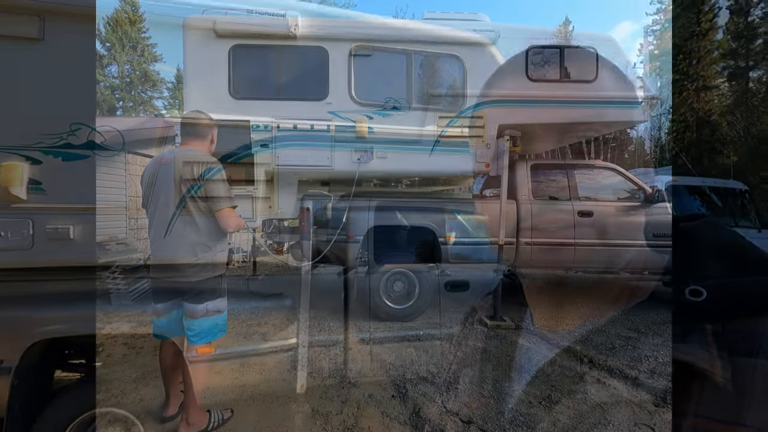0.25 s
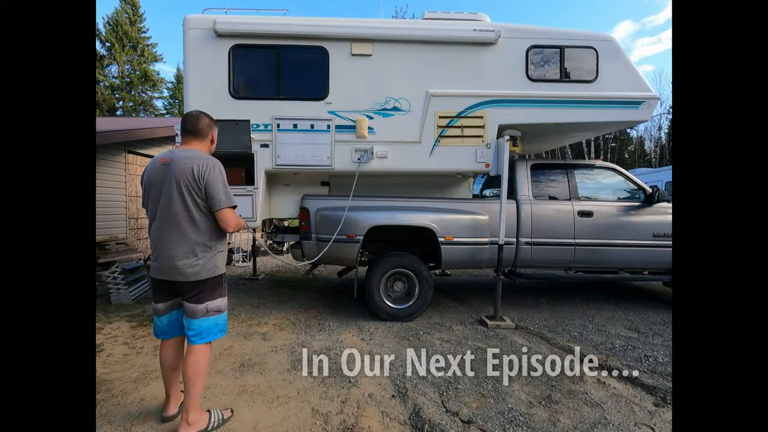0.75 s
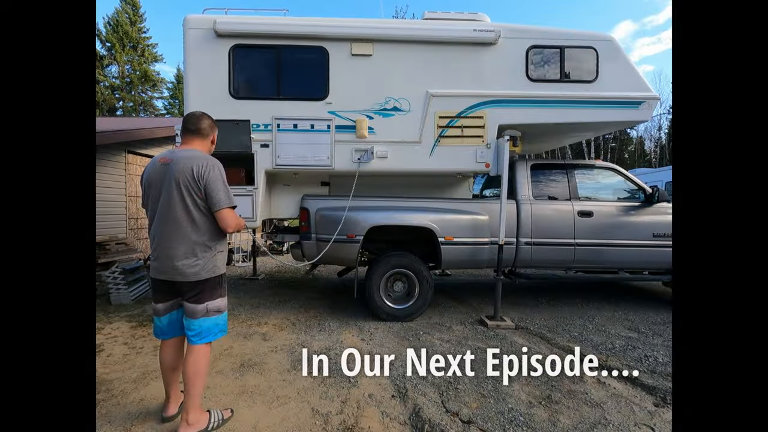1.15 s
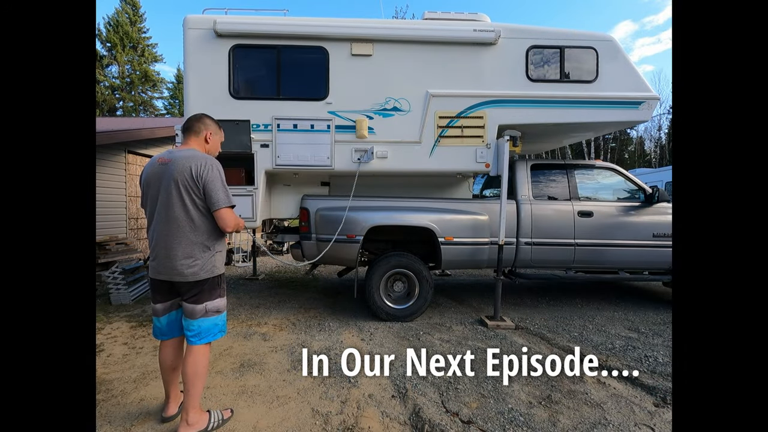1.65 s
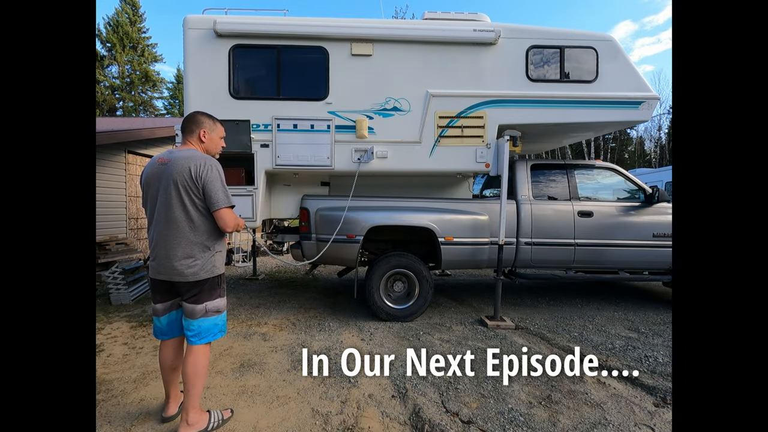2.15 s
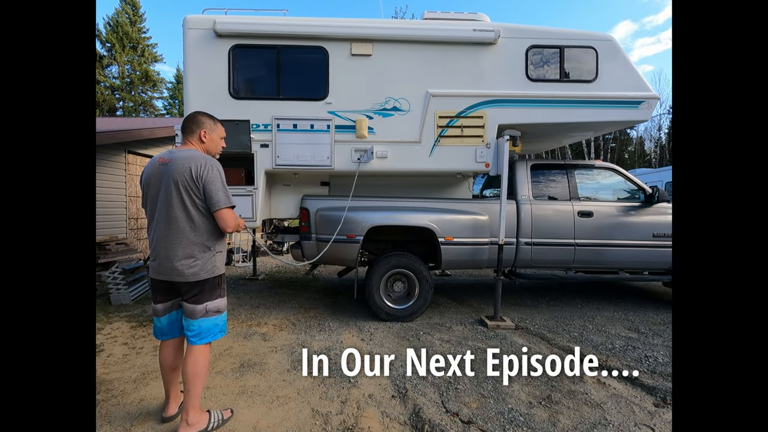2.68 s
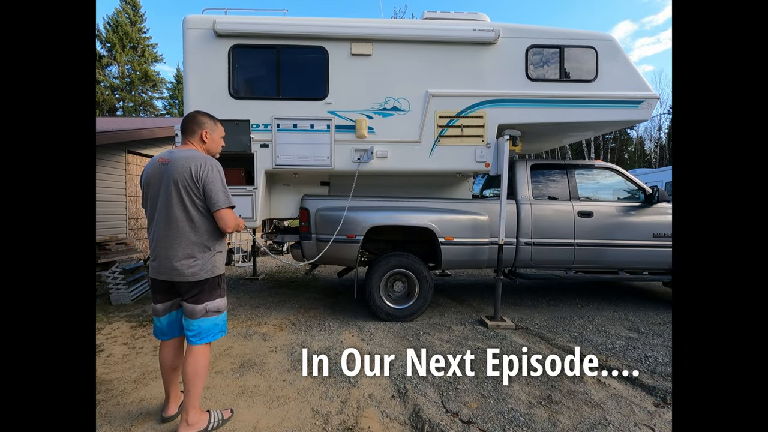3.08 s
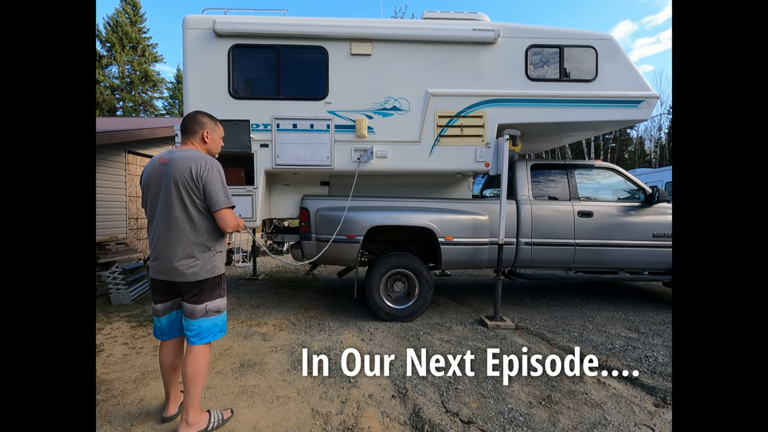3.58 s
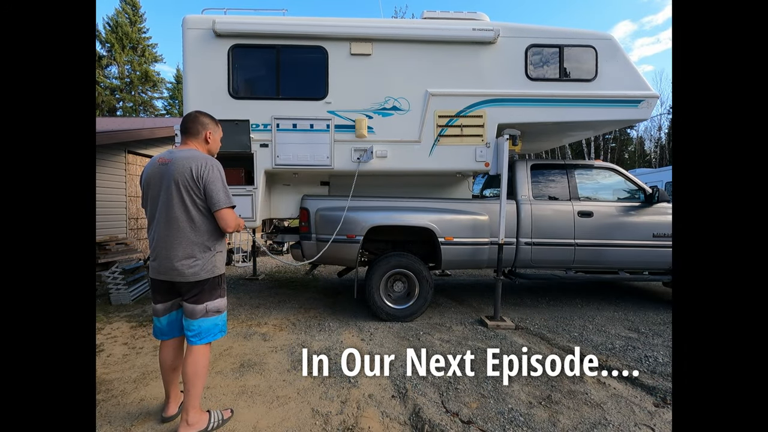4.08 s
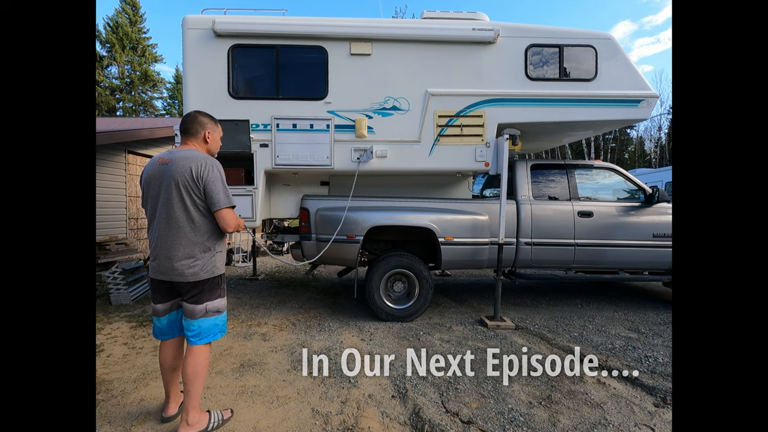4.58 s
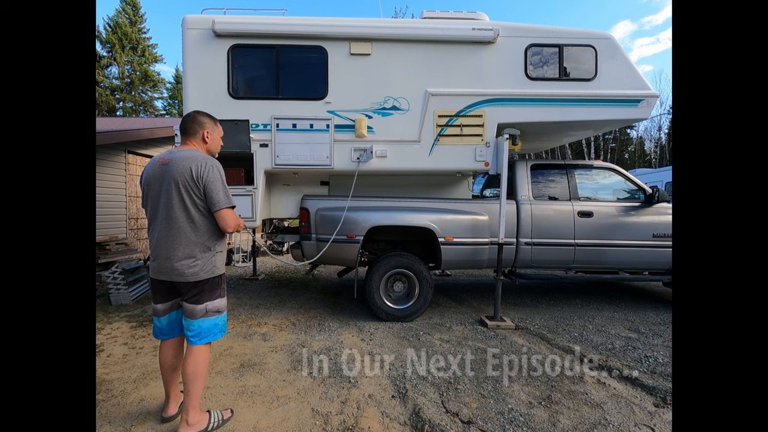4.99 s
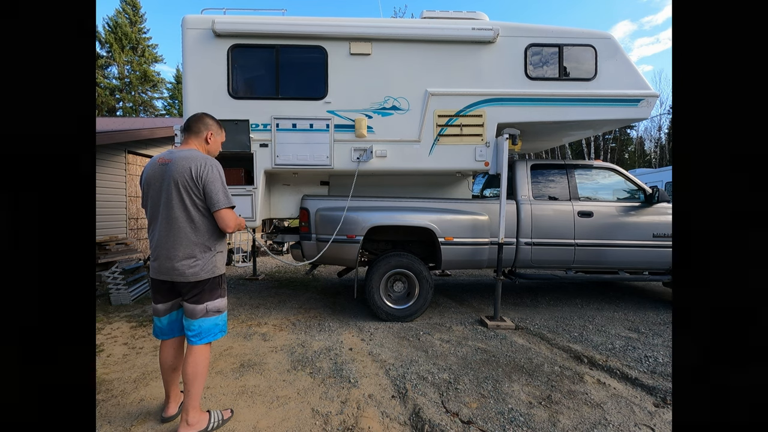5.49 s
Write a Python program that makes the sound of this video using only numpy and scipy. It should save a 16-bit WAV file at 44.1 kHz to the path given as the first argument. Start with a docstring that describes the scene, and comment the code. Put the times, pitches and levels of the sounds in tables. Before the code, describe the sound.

Outdoors, a relay click and short gritty motor buzz, a second of quiet air, then a longer geared electric whine that cuts off abruptly.

```python
"""Electric camper jacks in a quiet yard

A relay clicks and, out of a faint swelling noise, one motor buzzes for under a second: shaft harmonics
over gear chatter. After a pause a faster one clicks in, spins up, whines for over three seconds and is
switched off. Its pinion sings at the tooth rate over weaker shaft tones, chatter rung by the leg and a hum.
A slow wheel rasps once a turn, and the lifting screw drags the pitch down each time it binds.
Noise bursts make the clicks and the jolts of the leg; soft, coloured noise is the outdoor air."""
import sys
import numpy as np
from scipy import signal
from scipy.fft import rfft, irfft
from scipy.io import wavfile

SR = 44100
rng = np.random.default_rng(int(sys.argv[2]) if len(sys.argv) > 2 else 0)


def inscribe(sig):
    """Save sig as 16-bit PCM at rate SR to the path in sys.argv[1].

    A 1-D sig is mono; a 2-D sig holds one channel per row.
    Samples are clipped to [-1, 1] before scaling.
    """
    pcm = np.round(np.clip(np.atleast_2d(sig).T, -1, 1) * 32767)
    wavfile.write(sys.argv[1], SR, pcm.astype(np.int16))


N = 252867
TIME = np.arange(N) / SR  # seconds

# spectrum of the outdoor air: f/Hz, level/dB
YARD_COLOUR = [(15, -25), (25, -22), (91, -9.5), (142, -15.5), (175, -4), (267, -5.5), (348, -2.5),
               (441, -3.5), (558, -1.5), (921, -10.5), (1480, -11), (6500, -35.5), (13500, -54)]
# relay contacts and gears taking up their slack: t/s, level/dB, decay/s, treble share (0-1)
CLICKS = [(0.1508, -35.5, 0.0023, 0.1), (0.1543, -38.5, 0.0036, 0.06), (2.064, -41, 0.0045, 0.33),
          (2.177, -25, 0.015, 0.7)]
# dull spectrum of the relay box: f/Hz, level/dB
RELAY_COLOUR = [(200, -26), (600, -8), (1500, 7), (2500, -3), (4400, -9), (5500, -28), (12000, -55)]
# the leg rings as a motor brakes or jerks into motion: t/s, level/dB, decay/s
JOLTS = [(1.06, -34, 0.045), (2.109, -27.5, 0.083), (5.481, -27, 0.03)]
# hollow spectrum of the jolted leg: f/Hz, level/dB
LEG_COLOUR = [(50, -43), (200, -19), (430, -15), (520, 2), (620, -5), (750, -4.5), (1500, -25),
              (2100, -14.5), (2700, -29), (6000, -68)]
# shaft speed of the buzzing jack before any coasting: t/s, f/Hz (turns a second)
BUZZ_SPEED = [(0.3, 57.6), (0.45, 58.48), (0.6, 57.83), (0.82, 58.56), (1.02, 57.33)]
# its gear and armature tones: multiple of the shaft speed, level/dB (against its loudness)
BUZZ_TONES = [(1, -42), (2.59, -30), (4, -27), (5, -24.5), (7.62, -24), (8, -23.5), (9, -20), (10, -14),
              (11, -8.5), (12, -20), (13.82, -20.5), (15, -15), (20, -24), (22, -17), (22.33, -14),
              (25, -11), (28, -15.5), (29, -18), (30, -12), (31, -14.5), (32, -18.5), (39, -16.5),
              (41, -13), (45, -17), (47, -17.5), (50, -16), (51, -18), (60, -23.5), (65, -20)]
# how its leg radiates the chatter: f/Hz, level/dB
BUZZ_BODY = [(60, -21.5), (200, -10), (350, -9), (490, 1), (650, -5.5), (800, -8), (1000, -6.5),
             (1300, -0.5), (1800, -6), (2100, -9.5), (2380, -2), (2950, -7), (3300, -10.5), (4700, -13.5),
             (5100, -19.5), (7200, -27.5), (12000, -49.5)]
# slow drift of the whining shaft's running speed: t/s, f/Hz (offset)
DRIFT = [(2.7, -0.28), (3.05, 0.23), (3.8, .3), (4.15, -0.28), (4.7, -.2), (5.4, 0.23)]
# weaker tones of the whining jack: multiple of the shaft speed, level/dB (against its loudness)
WHINE_TONES = [(2, -32.5), (3, -32.5), (3.81, -24.5), (5, -23.5), (7.62, -31.5), (8, -22.5), (9, -24),
               (10.95, -29), (11.43, -29.5), (12, -19.5), (15, -19), (16.19, -21), (22, -23), (23, -47),
               (23.81, -22), (25, -26), (29, -20.5), (45, -18.5), (53, -22), (93, -28), (95, -24)]
# how its leg radiates the chatter: f/Hz, level/dB
WHINE_BODY = [(25, -42), (60, -41.5), (220, -19.5), (380, -17.5), (540, 1), (690, 2), (830, -9.5),
              (1200, -8.5), (1800, -7.5), (2050, -4.5), (2350, -9.5), (2800, -7), (3700, -13),
              (4900, -20.5), (5700, -12), (6250, -9), (6550, -20.5), (8000, -30), (12000, -49)]
# pinion overtones: multiple of the mesh tone, level/dB (against the driven loudness),
# extra/dB while accelerating, dip/dB once a wheel turn, phase shiver/rad
MESH_OVERTONES = [(2, -8, -2, 7, 0.25), (3, -12.5, 6.5, 16, 0.86), (4, -20, 8.5, 2, 0.94)]
# dry rasp of the slow wheel, also the bright clicks: f/Hz, level/dB
RASP_COLOUR = [(500, -8.5), (2500, 8.5), (6000, 2.5), (7500, -10.5), (11000, -8), (13500, -26)]

YARD_DB = -52
TOP_HZ = 13700  # upper edge of the microphone's range

# faint noise that swells before the buzz: its level as the buzz starts
SWELL_DB = -51.5
# buzzing jack: start, loudness, and the extra kick as it starts
BUZZ_START_S, BUZZ_DB, KICK_DB, KICK_S = 0.2835, -31, 1.5, 0.052
# switched off, it coasts to rest; the level drops at once as the teeth unload, then dies with the speed
BUZZ_OFF_S, BUZZ_COAST_S, UNLOAD_DB, UNLOAD_S = 1.035, 0.2, -7, 0.0083

# whining jack: power on and off, nominal running speed, time constants of spin-up and braking
WHINE_ON_S, WHINE_OFF_S, WHINE_HZ = 2.052, 5.484, 65.9
SPIN_UP_S, BRAKE_S = 0.087, 0.081
# its loudness, reached once the shaft turns this fast
WHINE_DB, FULL_NOISE_HZ = -28.5, 36.2
# lifting screw: seconds a turn, one moment of tight fit, and how lopsided the drag is (turns)
SCREW_TURN_S, SCREW_TIGHT_S, SCREW_SKEW = 0.855, 3.3, 0.075
SCREW_SAG_HZ = 0.57  # shaft speed lost per unit of drag
# pinion: base level of the mesh tone and its slow easing from switch-on
PINION_TEETH, MESH_DB, MESH_EASE_DB_PER_S = 10, -24, -0.65
# the tone swells just before the screw binds; the leg hardly radiates it below a corner
MESH_LOAD_DB, MESH_LEAD_S, MESH_CORNER_HZ = 0.66, 0.085, 568
# extra while the motor pulls the load up to speed: centre and length of that pull
PULL_DB, PULL_AT_S, PULL_S = 3, 2.335, 0.13
# overtone lift, and the loss per unit of drag: teeth bite harder where the screw runs free
BITE_DB, BITE_FREE_DB = 3, 1.36
# slow wheel: shaft turns for each of its own, and one moment of rubbing
WHEEL_TURNS, WHEEL_RUB_S = 8.45, 3.755
# narrow resonance of the leg tube that the chatter keeps ringing
TUBE_HZ, TUBE_Q, TUBE_DB = 2167, 16, -17.5
# low hum: level at its swells, start and end, time between swells, one moment of silence
HUM_DB, HUM_ON_S, HUM_OFF_S, HUM_BEAT_S, HUM_NULL_S = -56.5, 2.63, 5.6, 1.28, 3.42


def undb(db):
    """Decibels to gain."""
    return 10 ** (np.asarray(db) / 20)


def unit(x):
    """Scale to an rms of 1."""
    return x / np.sqrt(np.mean(x ** 2))


def since(start):
    """Seconds gone by since a moment; zero before it."""
    return np.maximum(TIME - start, 0)


def curve(rows):
    """A two-column table joined by straight lines in time."""
    at, value = np.transpose(rows)
    return np.interp(TIME, at, value)


def response(points, hz):
    """Level in dB of a spectrum at the given frequencies, straight over log frequency."""
    f, db = np.transpose(points)
    return np.interp(np.log(np.maximum(hz, 1)), np.log(f), db)


def colour(x, points, size=4096):
    """Ring a body of the given spectrum with x: causal, and white noise keeps its power."""
    log_gain = np.log(undb(response(points, np.fft.rfftfreq(size, 1 / SR))))
    # folding the cepstrum onto positive time makes the ring minimum-phase
    cepstrum = irfft(log_gain)
    cepstrum[1:size // 2] *= 2
    cepstrum[size // 2 + 1:] = 0
    ring = irfft(np.exp(rfft(cepstrum)))
    return signal.fftconvolve(x, ring / np.linalg.norm(ring))[:N]


def walk(rate):
    """Random wander of rms 1 that heads for a new value rate times a second."""
    knots = rng.standard_normal(4096)
    return unit(np.interp(TIME * rate, np.arange(len(knots)), knots))


def burst(start, db, decay):
    """Noise with a sudden start and an exponential fade."""
    envelope = (TIME >= start) * np.exp(-np.abs(TIME - start) / decay)
    return undb(db) * envelope * rng.standard_normal(N)


def grains(scatter_db):
    """Dense tiny impacts of very unequal size."""
    return unit(rng.standard_normal(N) * undb(scatter_db * rng.standard_normal(N)))


def chatter(speed, repeat, scatter_db, lump_db, count=600):
    """Tooth impacts: flaws fixed on the shaft strike again on every turn, the rest fall at random."""
    turns = np.cumsum(speed) / SR
    place, size = rng.random(count), rng.standard_normal(count)
    strikes = np.arange(int(turns[-1]))[:, None] + place
    at = np.interp(strikes.ravel(), turns, np.arange(N)).astype(int)
    flaws = unit(np.bincount(at, np.tile(size, len(strikes)), N))
    impacts = np.sqrt(repeat) * flaws + np.sqrt(1 - repeat) * grains(scatter_db)
    # the tooth pressure rises and falls once a turn
    pressure = undb(lump_db * np.cos(2 * np.pi * turns))
    return pressure * impacts


def panels(x, ring_db, decay_s):
    """The camper's wall and the leg tube give every impact a short, dense ring."""
    age = TIME[:SR // 4]
    tail = rng.standard_normal(len(age)) * np.exp(-age / decay_s)
    ring = signal.fftconvolve(x, tail / np.linalg.norm(tail))[:N]
    return unit(x + undb(ring_db) * ring)


def soften(x, speed, corner_hz):
    """Slow teeth strike gently, so the treble goes as the shaft slows."""
    dull = signal.sosfilt(signal.butter(1, corner_hz, fs=SR, output="sos"), x)
    treble = x - dull
    return dull + (speed / np.max(speed)) ** 2 * treble


def tones(speed, table, body, flutter_db, slip):
    """Lines locked to the shaft; off top speed they slide through the leg's resonances."""
    turns, running = np.cumsum(speed) / SR, np.max(speed)
    out = np.zeros(N)
    for order, db in table:
        shift_db = np.minimum(response(body, order * speed) - response(body, order * running), 3)
        # slip is a phase wander in radians
        angle = 2 * np.pi * (order * turns + rng.random()) + slip * walk(18)
        level_db = db + shift_db + flutter_db * walk(21.88)
        out += undb(level_db) * np.sin(angle)
    # the lines fade quickly as the shaft slows
    return np.sqrt(2) * out * (speed / running) ** 3


def yard():
    """Soft outdoor air: coloured noise whose level wavers a little."""
    air = colour(rng.standard_normal(N), YARD_COLOUR)
    return undb(YARD_DB + 0.62 * walk(11)) * air


def clicks():
    """Short bursts: dull from the relay box, bright from the gears, hollow from the jolted leg."""
    dull = sum((1 - treble) * burst(start, db, decay) for start, db, decay, treble in CLICKS)
    bright = sum(treble * burst(start, db, decay) for start, db, decay, treble in CLICKS)
    hollow = sum(burst(start, db, decay) for start, db, decay in JOLTS)
    return colour(dull, RELAY_COLOUR) + colour(bright, RASP_COLOUR) + colour(hollow, LEG_COLOUR)


def buzzing_jack():
    """A dense comb of shaft harmonics over gear chatter starts abruptly, after a faint swelling noise."""
    coast = np.exp(-since(BUZZ_OFF_S) / BUZZ_COAST_S)
    speed = curve(BUZZ_SPEED) * coast
    comb = tones(speed, BUZZ_TONES, BUZZ_BODY, flutter_db=3.5, slip=0.39)

    strikes = chatter(speed, repeat=0.13, scatter_db=7, lump_db=-0.4)
    impacts = panels(strikes, ring_db=-4, decay_s=0.0059)
    rattle = soften(colour(impacts, BUZZ_BODY), speed, corner_hz=1500)

    kick_db = KICK_DB * np.exp(-since(BUZZ_START_S) / KICK_S)
    unload_db = UNLOAD_DB * (1 - np.exp(-since(BUZZ_OFF_S) / UNLOAD_S))
    loudness = undb(BUZZ_DB + kick_db + unload_db) * coast ** 2.5
    buzz = loudness * (comb + undb(-3.5) * rattle)
    # the faint noise has the same colour as the rattle
    swelling_noise = undb(SWELL_DB) * TIME / BUZZ_START_S * rattle
    # the buzz takes over from the swelling noise within milliseconds
    onset = 1 - np.exp(-since(BUZZ_START_S) / 0.001)
    return onset * buzz + (1 - onset) * swelling_noise


def hum():
    """A low hum at the nominal running speed that beats slowly; it builds late and outlasts the power."""
    held = (1 - np.exp(-since(HUM_ON_S) / 0.07)) * np.exp(-since(HUM_OFF_S) / 0.045)
    beat = np.abs(np.sin(np.pi * (TIME - HUM_NULL_S) / HUM_BEAT_S))
    tone = np.sqrt(2) * np.sin(2 * np.pi * WHINE_HZ * TIME)
    return undb(HUM_DB) * held * beat * tone


def screw_load(lead_s):
    """Drag of the lifting screw, a little ahead of time: it binds hard once a turn, lightly in between."""
    turn = (TIME + lead_s - SCREW_TIGHT_S) / SCREW_TURN_S
    hard = np.cos(2 * np.pi * (turn + SCREW_SKEW))
    twice_a_turn = 0.6 * np.cos(4 * np.pi * (turn - SCREW_SKEW / 2))
    return hard + twice_a_turn


def whine_speed():
    """The shaft spins up, sags wherever the screw binds, and is braked at switch-off (turns a second)."""
    running = WHINE_HZ + curve(DRIFT) - SCREW_SAG_HZ * screw_load(0)
    spin_up = 1 - np.exp(-since(WHINE_ON_S) / SPIN_UP_S)
    brake = np.exp(-since(WHINE_OFF_S) / BRAKE_S)
    return running * spin_up * brake


def wheel_turns(speed):
    """Turns of the slow reduction wheel, whole at each rub."""
    turns = np.cumsum(speed) / SR
    return (turns - np.interp(WHEEL_RUB_S, TIME, turns)) / WHEEL_TURNS


def tooth_errors(wheel, count=5):
    """An uneven pattern around the wheel that returns on each of its turns; rms 1."""
    return unit(sum(np.cos(2 * np.pi * (k * wheel + rng.random())) for k in range(2, count + 1)))


def tooth_ticks(rate, decay_s, scatter_db):
    """Now and then a tooth hits harder: a sharp tick that dies within milliseconds."""
    hits = (rng.random(N) < rate / SR) * undb(scatter_db * (2 * rng.random(N) - 1))
    envelope = signal.lfilter([1], [1, -np.exp(-1 / (decay_s * SR))], hits)
    return colour(unit(envelope * rng.standard_normal(N)), RASP_COLOUR)


def wheel_rasp(speed):
    """The reduction wheel runs slightly off centre: once on each of its turns it scrapes and ticks."""
    rub = np.exp(1.25 * (np.cos(2 * np.pi * wheel_turns(speed)) - 1))
    scrape = colour(chatter(speed, repeat=0.26, scatter_db=3, lump_db=0), RASP_COLOUR)
    ticks = undb(-5.5) * tooth_ticks(rate=75, decay_s=0.005, scatter_db=3)
    return rub * scrape + np.sqrt(rub) * ticks


def pinion(speed, loudness):
    """The mesh tone and its overtones; the off-centre wheel lets the teeth go slack once a turn."""
    wheel, running = wheel_turns(speed), np.max(speed)
    angle = 2 * np.pi * PINION_TEETH * np.cumsum(speed) / SR + 0.084 * tooth_errors(wheel)
    pull = np.exp(-((TIME - PULL_AT_S) / PULL_S) ** 2)

    ease_db = MESH_EASE_DB_PER_S * since(WHINE_ON_S)
    effort_db = ease_db + PULL_DB * pull + MESH_LOAD_DB * screw_load(MESH_LEAD_S)
    flutter_db = 1.5 * tooth_errors(wheel) + 0.6 * walk(12)
    radiated = np.minimum(PINION_TEETH * speed / MESH_CORNER_HZ, 1) ** 20
    out = radiated * undb(MESH_DB + effort_db + flutter_db) * np.sin(angle)

    # the overtones need the motor's drive and vanish at switch-off
    bite = undb(BITE_DB - BITE_FREE_DB * screw_load(0))
    drive = loudness * bite * np.exp(-since(WHINE_OFF_S) / 0.013)
    # teeth that pull the load up to speed stay in contact; at full speed they bounce in their backlash
    slack = 1 - 0.4 * pull
    dip = slack * np.sin(np.pi * (wheel - 0.04)) ** 4
    for order, db, pull_db, dip_db, shiver in MESH_OVERTONES:
        # spinning up, each overtone slides through the leg's resonances
        teeth = order * PINION_TEETH
        shift_db = response(WHINE_BODY, teeth * speed) - response(WHINE_BODY, teeth * running)
        level_db = db + np.clip(shift_db, -4, 2) + pull_db * pull - dip_db * dip + 1.34 * walk(24)
        out += drive * undb(level_db) * np.sin(order * angle + slack * shiver * walk(55))
    return np.sqrt(2) * out


def whining_jack():
    """A faster motor: the pinion sings above weaker tones, chatter, the throbbing rasp and a low hum."""
    speed = whine_speed()
    loudness = undb(WHINE_DB) * np.minimum(speed / FULL_NOISE_HZ, 1) ** 2.4
    comb = tones(speed, WHINE_TONES, WHINE_BODY, flutter_db=2.5, slip=1.0)

    strikes = chatter(speed, repeat=0.066, scatter_db=6.5, lump_db=0.2)
    impacts = panels(strikes, ring_db=-7, decay_s=0.0096)
    tube = unit(signal.lfilter(*signal.iirpeak(TUBE_HZ, TUBE_Q, fs=SR), impacts))
    rattle = undb(-0.5) * colour(impacts, WHINE_BODY) + undb(TUBE_DB) * tube
    rasp = undb(-10) * wheel_rasp(speed)

    # once the power is off the teeth strike ever more gently
    force = speed * np.exp(-since(WHINE_OFF_S) / 0.13)
    gear_noise = soften(rattle + rasp, force, corner_hz=1500)
    return loudness * (comb + gear_noise) + pinion(speed, loudness) + hum()


def scene():
    """Both jacks and their clicks in the open yard, as one channel."""
    mix = yard() + clicks() + buzzing_jack() + whining_jack()
    return mix[None]


def record(dry):
    """The microphone port cancels a narrow band of treble; the top is cut off."""
    notch = signal.iirnotch(9050, 4.5, fs=SR)
    heard = signal.lfilter(*notch, dry)
    return signal.sosfilt(signal.ellip(10, 0.2, 80, TOP_HZ, fs=SR, output="sos"), heard)


dry = scene()
out = record(dry)
inscribe(out)
```